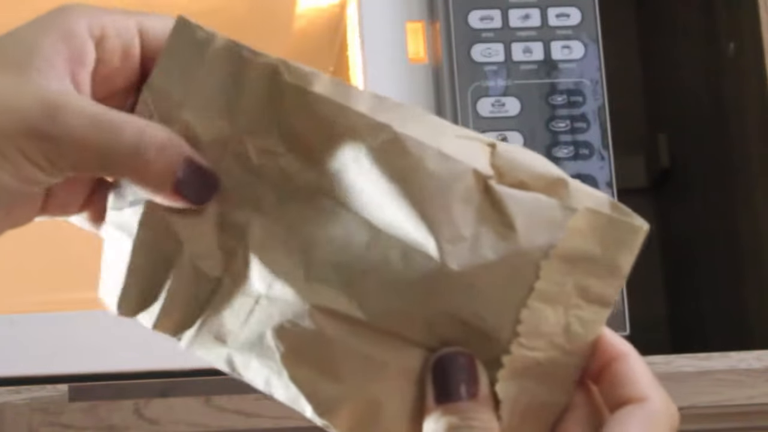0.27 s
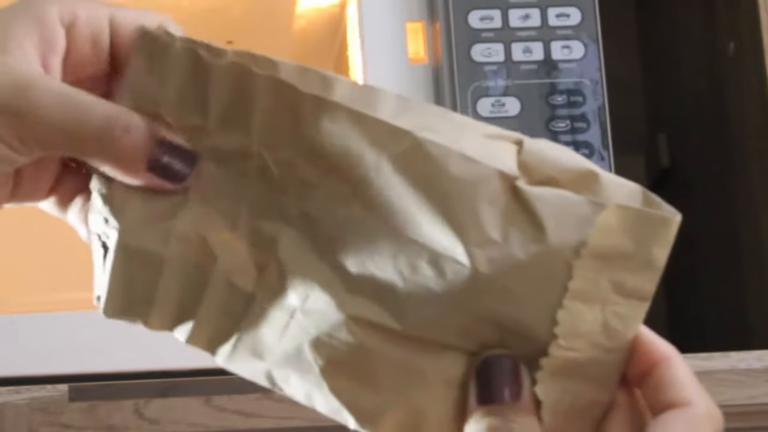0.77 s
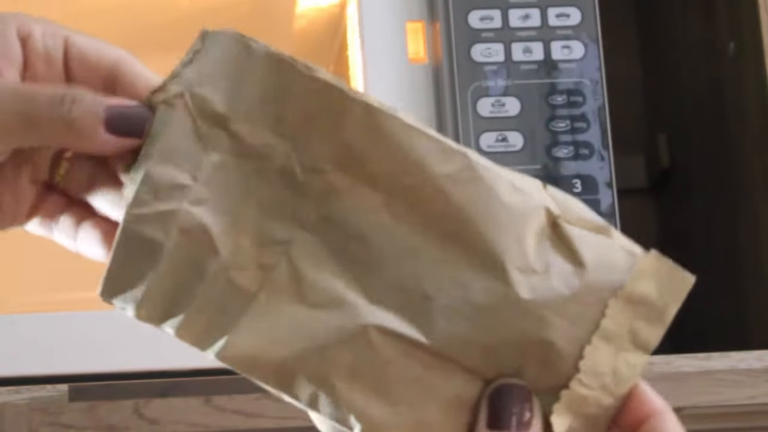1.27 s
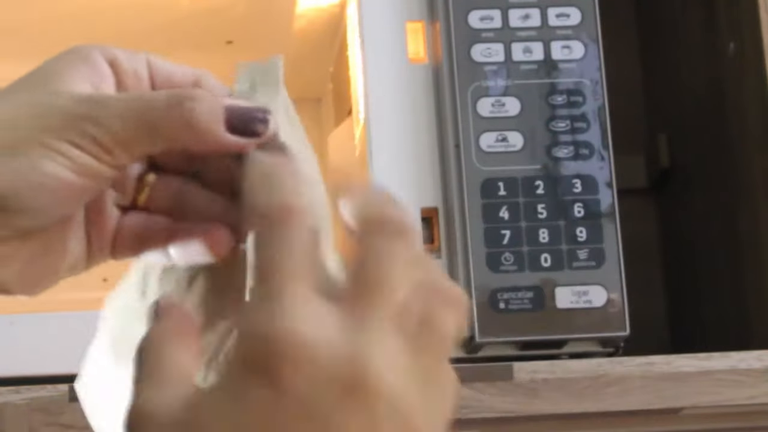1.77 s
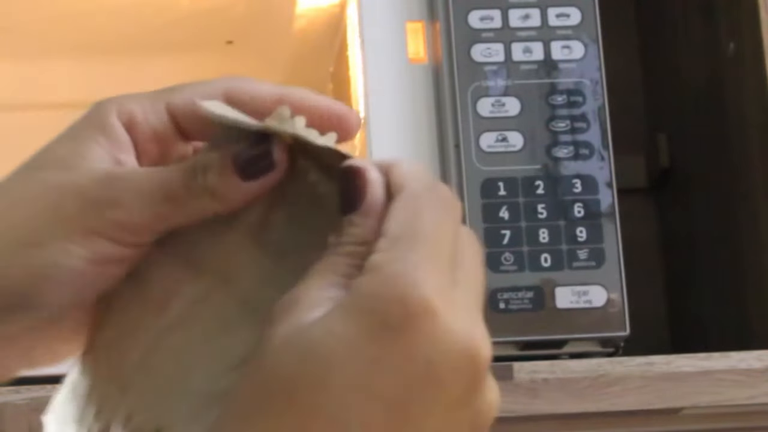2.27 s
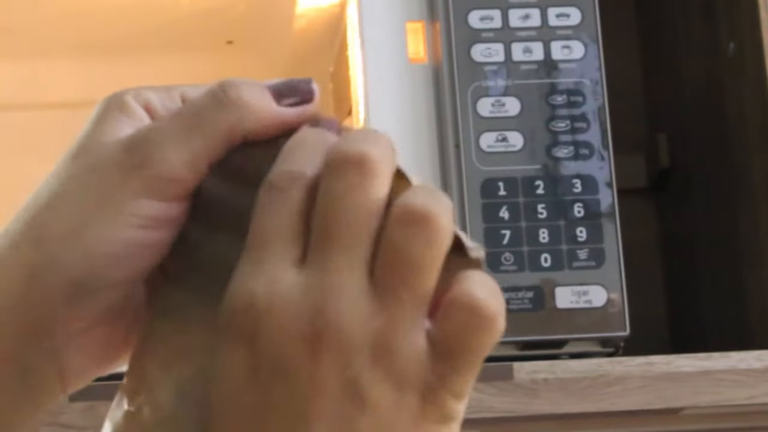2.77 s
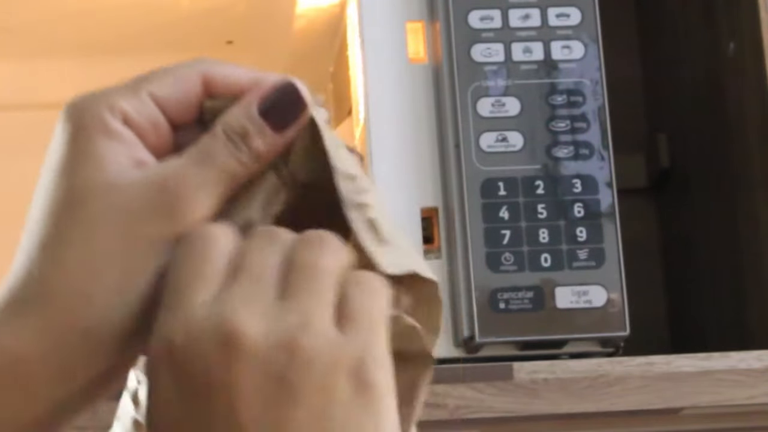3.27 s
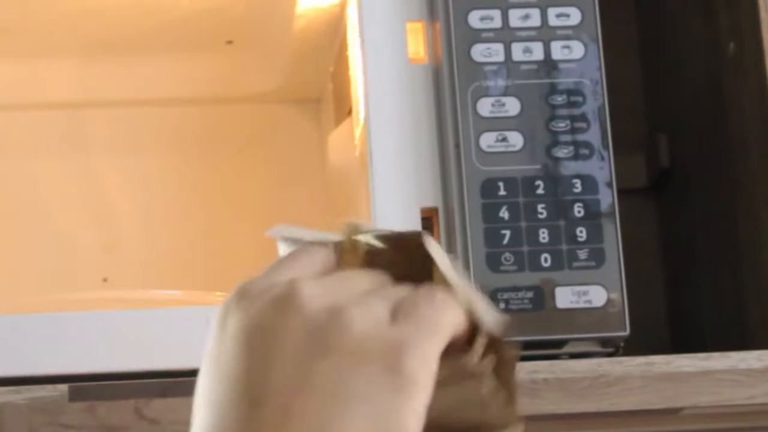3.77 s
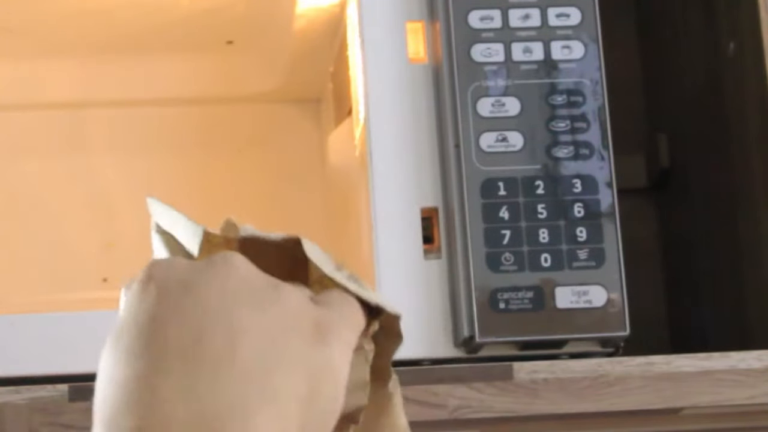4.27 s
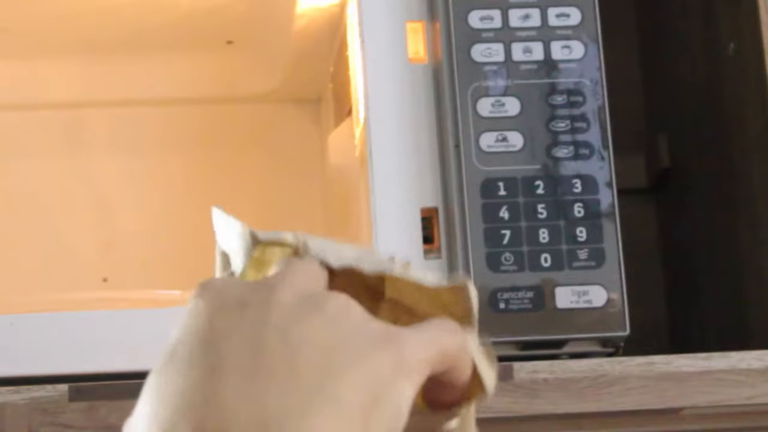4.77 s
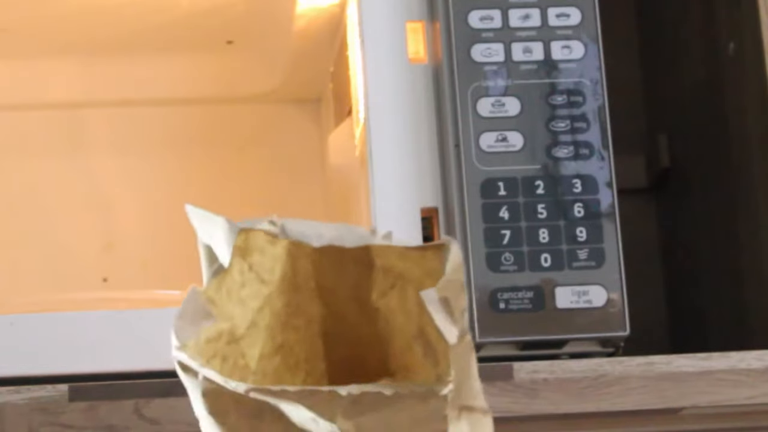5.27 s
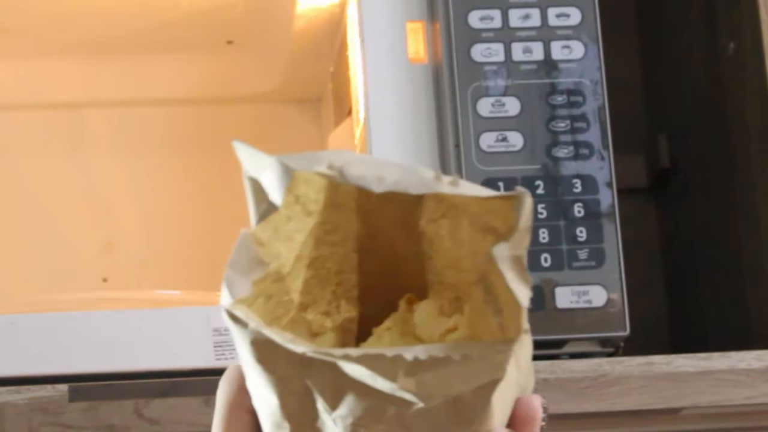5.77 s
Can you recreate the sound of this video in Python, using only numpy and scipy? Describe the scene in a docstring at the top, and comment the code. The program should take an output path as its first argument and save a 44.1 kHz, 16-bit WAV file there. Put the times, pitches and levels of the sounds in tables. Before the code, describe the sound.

A stiff paper bag crackles sharply, softens into sparse crinkles, then rustles loudly as hands pull it open in a hard-walled kitchen before falling nearly silent.

```python
"""Paper bag unfolded and pulled open by two hands, before an open oven in a hard-walled kitchen.
Creases: random short damped rings in three sizes, levels following the pulls; single buckles add a
ring with a bright edge and set off showers of clicks. Bag radiation and air modes shape them; the
room adds early echoes and a tail of about half a second. Also air puffs, one low thump, and a
floor of rumble and hiss."""
import sys
import numpy as np
from scipy import signal
from scipy.fft import rfft, irfft, next_fast_len
from scipy.io import wavfile
from scipy.ndimage import uniform_filter1d

SR = 44100
rng = np.random.default_rng(int(sys.argv[2]) if len(sys.argv) > 2 else 0)


def transcribe(u):
    """Save the signal u as a 16-bit wav file named by the first command-line argument.

    u: samples, shape (n,) or (channels, n), limited to [-1, 1]; the rate is SR.
    q: integer samples, one column per channel.
    """
    v = np.clip(np.atleast_2d(u).T, -1, 1)
    q = np.round(v * 32767).astype(np.int16)
    wavfile.write(sys.argv[1], SR, q)


N = 265261  # samples

# pulls or squeezes of the hands: [start t/s, rise t/s, hold t/s, level/dB,
# wide panels re pull level/dB, fine creases re pull level/dB]
PULLS = [(0.0, 0.0011, 0.053, -28.5, -5.5, -13), (0.135, 0.0032, 0.013, -31.5, -9, -12.5),
         (0.185, 0.012, 0.032, -37.5, -19, -8), (0.274, 0.0055, 0.042, -30.5, -7, -9.5),
         (0.432, 0.0021, .01, -28.5, -6, -10.5), (0.458, 0.01, .05, -35.5, -22, -2.5),
         (0.576, 0.007, 0.052, -33, -16, -11), (0.643, 0.021, 0.085, -33, -1.5, -2),
         (0.76, 0.0079, 0.016, -26, -12, -11.5), (0.865, 0.013, 0.064, -33, -7.5, -9.5),
         (1.099, 0.0082, 0.013, -48, -1.5, -3.5), (1.199, 0.0029, 0.038, -32, -8.5, -9.5),
         (1.39, 0.0035, 0.12, -34.5, -8, -13.5), (1.54, 0.0098, 0.094, -41.5, -6.5, -6),
         (1.695, 0.013, 0.024, -39, -8, -6), (1.856, 0.0033, 0.17, -36.5, -7, -6.5),
         (1.956, 0.0092, 0.2, -40, -3.5, -2.5), (2.109, 0.011, 0.021, -33, -1, -20),
         (2.284, 0.0017, 0.012, -37.5, -4, -2), (2.349, 0.012, 0.094, -39, -5, -0.5),
         (2.52, 0.012, 0.023, -47.5, -18, -1.5), (2.595, 0.026, 0.016, -31.5, -9.5, -8),
         (2.68, 0.0041, 0.0075, -45.5, -10, 2), (2.785, 0.014, 0.011, -41, -4.5, -15),
         (2.83, 0.031, 0.051, -41, -23, -4.5), (2.935, 0.054, 0.057, -34.5, -25, -5),
         (3.027, 0.0031, 0.14, -36, -7, -1.5), (3.129, 0.041, 0.03, -32.5, -7.5, 0.5),
         (3.179, 0.024, 0.041, -23.5, -8, -9), (3.358, 0.036, 0.041, -25, -11, -6),
         (3.47, 0.017, 0.037, -34, -7, -5), (3.532, 0.0045, 0.035, -30, -28, -4.5),
         (3.639, 0.005, 0.038, -32, -32, -10), (3.72, 0.017, 0.039, -27.5, -5, -5.5),
         (3.916, 0.0043, 0.058, -28, -5.5, -8), (4.04, 0.019, 0.13, -31, -5, -9),
         (4.217, 0.0059, 0.2, -29, -13, -9), (4.419, 0.0049, 0.094, -27.5, -11, -11),
         (4.528, 0.007, 0.015, -26.5, -6.5, -5), (4.63, 0.0087, 0.063, -29.5, -12, -7.5),
         (4.74, 0.027, 0.087, -36.5, -15, -11.5), (4.809, 0.018, 0.071, -34, -2.5, -8),
         (5.186, 0.0027, 0.026, -46, -54, 0), (5.636, 0.0027, 0.014, -59, 14, -13.5)]
# fall of level after the hold, as the paper comes to rest
SETTLE_DB_PER_S, WIDE_SETTLE_DB_PER_S, FINE_SETTLE_DB_PER_S = 100.5, 98, 178

# crease sizes: [lowest f/Hz, highest f/Hz, mean rate/(clicks per s), ring/cycles,
# size spread level/dB, level re pull/dB]
WIDE_PANELS = (150, 854, 500, 4, 3, -4.5)
FOLDS = (903, 5957, 1801, 3, 1, -7)
FINE_FIBRES = (5995, 14000, 1589.5, 0.5, -2.5, 4.5)
# air pushed out of the bag: [columns as crease sizes]
AIR_PUFFS = (36, 168, 72, 2.5, -1.5, -36.5)

# single loud buckles, before radiation and room: [t/s, ring peak level/dB, ring f/Hz,
# edge peak re ring level/dB]
LOUD_BUCKLES = [(0.0396, -21, 2540, -13), (0.092, -24, 4220, -7), (0.118, -23, 3580, -11),
                (0.1884, -21, 2200, -17), (0.2388, -24, 2500, -17), (0.2704, -24, 4390, -4),
                (0.2846, -17, 2450, -12), (0.2978, -17, 2540, -19), (0.3284, -20, 2070, -13),
                (0.3488, -23, 3530, -5), (0.4114, -26, 2670, -20), (0.4396, -17, 2410, -5),
                (0.463, -18, 4310, -7), (0.4716, -17, 2580, -12), (0.5007, -15, 2890, -10),
                (0.5799, -17, 2020, -13), (0.6485, -22, 4740, -6), (0.661, -19, 2710, -13),
                (0.6774, -20, 2840, -10), (0.7042, -15, 1640, -12), (0.7103, -18, 5380, -4),
                (0.7434, -15, 2580, -13), (0.808, -18, 2670, -13), (0.8646, -13, 1720, -17),
                (0.8702, -22, 1080, -16), (0.9049, -22, 2670, -4), (0.9218, -19, 2450, -15),
                (1.1007, -34, 1980, -13), (1.1269, -30, 1340, -15), (1.2045, -16, 2110, -15),
                (1.2273, -21, 2450, -13), (1.3947, -27, 1640, -5), (1.4226, -26, 1850, -8),
                (1.4933, -24, 2070, -17), (1.5412, -27, 2500, -6), (1.551, -19, 1720, -20),
                (1.6232, -22, 4870, -9), (1.6976, -29, 2200, -15), (1.7506, -28, 1980, -8),
                (1.7866, -30, 3960, -10), (1.8601, -25, 2710, -14), (1.8856, -23, 3230, -16),
                (1.9089, -23, 2840, -14), (1.9579, -21, 2330, -12), (2.1201, -26, 900, -10),
                (2.2912, -22, 3270, -5), (2.3502, -22, 3490, -8), (2.3953, -14, 4010, -7),
                (2.534, -27, 4180, -14), (2.6076, -26, 1890, -6), (2.6941, -24, 2280, -10),
                (2.7352, -29, 1460, -11), (2.7878, -29, 1980, -20), (2.8311, -33, 3490, -11),
                (2.8662, -29, 3320, -5), (2.8729, -28, 8900, -8), (2.8971, -25, 1550, -11),
                (2.9542, -26, 1590, -16), (2.9824, -24, 2670, -11), (3.0295, -16, 4010, -6),
                (3.0784, -21, 3140, -2), (3.1554, -18, 1810, -4), (3.229, -17, 2400, -10),
                (3.2514, -15, 4570, -13), (3.3185, -18, 2450, -16), (3.5045, -18, 1460, -5),
                (3.5455, -18, 2110, -10), (3.5667, -16, 1590, -11), (3.7615, -17, 3000, -10),
                (3.9202, -19, 2580, -9), (4.0399, -20, 1890, -15), (4.0473, -18, 1940, -11),
                (4.0911, -15, 1810, -20), (4.1151, -19, 1940, -8), (4.1535, -22, 1980, -10),
                (4.2407, -19, 5470, -7), (4.334, -18, 2930, -7), (4.4252, -16, 1810, -14),
                (4.4735, -16, 3360, -16), (4.5631, -16, 1770, -9), (4.8172, -26, 2280, -16),
                (4.843, -21, 2580, -9), (4.8529, -19, 2020, -7), (4.969, -28, 1050, -15),
                (5.0132, -32, 1640, -18), (5.0489, -35, 2890, -15), (5.1865, -22, 8500, -6),
                (5.1934, -29, 4690, -6), (5.2097, -30, 1750, -8), (5.246, -31, 2330, -12),
                (5.3106, -39, 3700, -13), (5.6404, -42, 2500, -10)]
# lesser buckles at random moments; peak is relative to the pull level
LESSER_PER_S, LESSER_MAX_DB, LESSER_SPREAD_DB = 4, 6, 6
LESSER_LOW_HZ, LESSER_HIGH_HZ, LESSER_EDGE_DB = 1500, 5130, -10

# free-hanging paper, corner below which the held bag radiates poorly: [t/s, f/Hz]
FREE_PAPER = [(0, 326), (.4, 480), (.9, 362), (1.2, 656), (2.0, 850), (2.15, 515), (2.5, 920), (2.95, 915),
              (3.4, 260), (3.8, 300), (4.4, 470), (4.669, 110), (4.8, 534), (5.1, 614), (5.22, 1520),
              (5.6, 880)]
# pitch coloured by the patch under the fingers: [t/s, f/Hz, lift level/dB]
FINGER_PATCH = [(0.2, 2400, -0.5), (.5, 3040, 0), (.9, 1110, 1.5), (1.12, 1300, 2.5), (1.25, 2930, -0.5),
                (1.42, 1080, 4), (1.58, 1820, 2), (1.75, 3030, 4), (1.95, 3160, 2), (2.14, 1000, 2),
                (2.4, 4080, -1.5), (2.62, 1720, 4.5), (2.82, 2000, 1.5), (2.97, 1450, 4.5), (3.2, 1890, 0),
                (3.6, 2520, 1), (3.77, 985, 3), (4.08, 1630, 1.5), (4.3, 1100, -1.5), (4.57, 1000, 1.5),
                (4.85, 3500, 1.5), (5.02, 980, 2), (5.22, 4730, 4.5), (5.5, 4700, 2), (5.7, 4850, 7)]
PATCH_OCTAVES = 0.53
# air in the bag, folded shut: [f/Hz, width f/Hz, lift level/dB]
SHUT_BAG_MODES = [(496, 20, 5), (663, 17, 10.5), (850, 32, 6)]
# air in the bag, mouth open: [f/Hz, width f/Hz, lift level/dB]
OPEN_BAG_MODES = [(1020, 70, 7), (1720, 150, 8), (2330, 100, 6)]
# how clearly the open mouth rings: [t/s, factor on the open-bag lift in dB]
OPEN_MOUTH = [(1.0, 0.0), (3.0, .1), (3.7, .35), (4.9, .35), (5.03, .7), (5.2, 1.4), (5.3, 1.2), (5.55, .3)]

# air modes of open oven and bag, in the room answer: [f/Hz, width f/Hz, level/dB]
CAVITY_MODES = [(341, 33, -6), (516.5, 46, 7), (686, 36, 1.5), (850, 16, 2), (1024, 52, -3.5),
                (1200, 180, -8), (1680, 23, -15.5), (2366, 96, -11.5)]
# room decay: [f/Hz, t60/s]
KITCHEN_T60 = [(150, 0.5), (600, 0.18), (1800, 0.48), (4500, 0.57), (9000, 0.49), (15000, 0.58)]
# early echoes: [delay t/s, level/dB]
EARLY_ECHOES = [(.0052, -16), (.0095, -36), (0.018, -26), (0.025, -29.5)]
# room tail: [f/Hz, left-right likeness (0 to 1)]
TAIL_LIKENESS = [(40, 0.18), (300, 0.86), (1000, 0.71), (2500, 0.49), (6000, 0.31), (14000, 0.15)]
# microphone response: [f/Hz, level/dB]
MIC_RESPONSE = [(60, -52), (130, -9), (250, -9), (310, -1.5), (400, -2), (800, -5.5), (1500, -2.5),
                (3000, 0.5), (6000, -1.2), (10000, -6.5), (15500, -17)]

# rumble and hiss, spectrum shape: [f/Hz, relative level/(dB per Hz)]
FLOOR_SPECTRUM = [(15, -26), (25, 1), (126, -1), (267, -2), (368, -0.5), (537, -4.5), (1140, -6),
                  (9050, -16), (13900, -24), (15500, -46)]
FLOOR_RMS_DB = -64.5
# rumble and hiss: [f/Hz, left-right likeness (0 to 1)]
FLOOR_LIKENESS = [(60, 0.052), (1000, 0.018)]
# rumble and hiss: [f/Hz, left re right level/dB]
FLOOR_BALANCE = [(30, -6), (100, -3), (250, -0.5)]

# jolt of the whole bag: [t/s, peak level/dB, ring f/Hz, ring/cycles]
BAG_THUMP = (4.635, -42.5, 148, 5.5)
BAND_LIMIT_HZ = 15750


def gain_of(db):
    """Decibels to an amplitude factor."""
    return 10 ** (np.asarray(db) / 20)


def evened(x):
    """Scales to rms 1."""
    return x / np.sqrt(np.mean(x ** 2) + 1e-20)


def read(points, hz):
    """Interpolates a table on a log-frequency axis."""
    f_hz, value = np.transpose(points)
    return np.interp(np.log(hz + 1), np.log(f_hz + 1), value)


def pair(a, b, likeness):
    """Mixes two independent signals into channels of the given likeness."""
    likeness = np.clip(likeness, -1, 1)
    return np.array([a, likeness * a + np.sqrt(1 - likeness ** 2) * b])


def effort(levels_db, settle_db_per_s):
    """Power sum of all pulls in dB: each rises, holds, then settles at a steady dB rate."""
    t_s = np.arange(0, N, 32) / SR
    power = 1e-12
    for (start_s, rise_s, hold_s, *_), db in zip(PULLS, levels_db):
        rising = np.clip((t_s - start_s) / max(rise_s, 1e-3), 0, 1)
        settled_db = settle_db_per_s * np.maximum(t_s - start_s - rise_s - hold_s, 0)
        power = power + (rising * gain_of(db - settled_db)) ** 2
    return np.interp(np.arange(N) / SR, t_s, 10 * np.log10(power))


def buckle(hz, cycles, phase):
    """A crease flips over: sudden start, then a ring damped by the paper within a few cycles."""
    u = np.arange(int(6 * cycles * SR / hz) + 8) * hz / SR  # time in cycles
    ring = np.sin(2 * np.pi * (u + phase)) * np.exp(-2.5 * u / cycles)
    click = ring * np.minimum(u / 0.15, 1)
    return click - click.mean()


def crackle(kind, level_db, clumps, count=12):
    """Sparse clicks of one size, from places spread across the bag, bunched in clumps."""
    low_hz, high_hz, per_s, cycles, spread_db, kind_db = kind
    size = gain_of(spread_db * np.minimum(rng.exponential(1, N), 3))
    size = size * rng.choice([-1., 1.], N)
    size = size * (rng.random(N) < per_s * clumps / SR)
    which = rng.integers(0, count, N)
    out = np.zeros((2, N))
    for k, hz in enumerate(np.geomspace(low_hz, high_hz, count)):
        click = buckle(hz, cycles, rng.random())
        # each place works in spells, 12 random levels per s
        busy = np.interp(np.arange(N) / SR * 12, np.arange(80), rng.standard_normal(80))
        size_here = size * (which == k) * gain_of(2.2 * busy)
        train = signal.oaconvolve(size_here, click / np.linalg.norm(click))[:N]
        # off-centre places: one sample between channels
        out += [train, np.roll(train, (0, 1, 0, -1)[k % 4])]
    return gain_of(kind_db + level_db) * evened(out)


def buckle_rows(pull_db):
    """Loud buckles plus random lesser ones whose peaks follow the pull; columns as LOUD_BUCKLES."""
    when, pitch, size = rng.random((200, 3)).T
    t_s = np.cumsum(-np.log(1 - when) / LESSER_PER_S)
    db = np.interp(t_s, np.arange(N) / SR, pull_db) + LESSER_MAX_DB - LESSER_SPREAD_DB * size
    hz = LESSER_LOW_HZ * (LESSER_HIGH_HZ / LESSER_LOW_HZ) ** pitch
    lesser = [(*row, LESSER_EDGE_DB) for row in zip(t_s, db, hz) if row[0] < N / SR]
    return list(LOUD_BUCKLES) + lesser


def clumping(rows):
    """Click-rate factor, mean 1: random bunching times a decaying shower after each buckle."""
    triggers = np.zeros(N + SR)
    at = [round((row[0] + .002) * SR) for row in rows]
    triggers[at] = np.where(np.arange(len(rows)) < len(LOUD_BUCKLES), 1, .4)
    showers = signal.oaconvolve(triggers, np.exp(-np.arange(4000) / SR / .018))[:N]
    slow_noise = uniform_filter1d(uniform_filter1d(rng.standard_normal(N), 200), 200)
    clumps = gain_of(1.5 * evened(slow_noise)) * (1.6 + showers)
    return clumps / clumps.mean()


def snaps(rows):
    """Each buckle: a ring at its own pitch under a sharp bright edge at 6.5 to 10.5 kHz."""
    out = np.zeros((2, N + SR))
    chance = rng.random((300, 3))
    for (t_s, db, hz, edge_db), (phase, edge_pitch, side) in zip(rows, chance):
        at = round(t_s * SR)
        ring = buckle(hz, 2.0, .2 * phase)
        edge = buckle(6500 + 4000 * edge_pitch, 3.5, phase)
        ring = ring / abs(ring).max()
        edge = gain_of(edge_db) * edge / abs(edge).max()
        pan_db = 3.0 * (side - .5) * np.array([[1], [-1]])
        for click in (ring, edge):
            out[:, at:at + len(click)] += gain_of(db + pan_db) * click
    return out[:, :N]


def air_puffs(pull_db, clumps):
    """Low damped pulses of air pushed from the bag; partly independent channels."""
    a, b = [crackle(AIR_PUFFS, pull_db + db, clumps, count=3)[0] for db in (-3, 2)]
    return np.array([a + 0.22 * b, b])


def rustle():
    """Three crease sizes, lesser buckles and air puffs follow the pulls; loud buckles have their
    own times and levels; returns creases, puffs."""
    db, wide_db, fine_db = np.transpose(PULLS)[3:]
    pull_db = effort(db, SETTLE_DB_PER_S)
    rows = buckle_rows(pull_db)
    clumps = clumping(rows)
    creases = crackle(WIDE_PANELS, effort(db + wide_db, WIDE_SETTLE_DB_PER_S), clumps)
    creases += crackle(FOLDS, pull_db, clumps)
    creases += crackle(FINE_FIBRES, effort(db + fine_db, FINE_SETTLE_DB_PER_S), clumps)
    return creases + snaps(rows), air_puffs(pull_db, clumps)


def lift_db(modes, hz):
    """Sum of bell-shaped resonance lifts in dB."""
    return sum(db / (1 + (2 * (hz - f) / width) ** 2) for f, width, db in modes)[:, None]


def radiate(x):
    """Bag radiation: shelf below the free-paper corner, patch pitch and bag-air resonances."""
    hz, t_s, z = signal.stft(x, SR, nperseg=1024, noverlap=768)
    point_s, corner_hz = np.transpose(FREE_PAPER)
    octaves = np.log2((hz[:, None] + 1) / np.interp(t_s, point_s, corner_hz))
    shelf_db = -14 / (1 + np.exp(3.7 * octaves))
    point_s, patch_hz, patch_db = np.transpose(FINGER_PATCH)
    apart = np.log2((hz[:, None] + 1) / np.interp(t_s, point_s, patch_hz)) / PATCH_OCTAVES
    finger_db = np.interp(t_s, point_s, patch_db) * np.exp(-apart ** 2)
    mouth = np.interp(t_s, *np.transpose(OPEN_MOUTH))
    air_db = lift_db(SHUT_BAG_MODES, hz) * np.maximum(1 - mouth, 0)
    air_db = air_db + lift_db(OPEN_BAG_MODES, hz) * mouth
    z = z * gain_of(shelf_db + finger_db + air_db)
    return signal.istft(z, SR, nperseg=1024, noverlap=768)[1][:, :N]


def tail():
    """Early echoes from counter and oven, then dense taps with a decay time per band."""
    taps = np.zeros((2, SR))
    at = np.arange(200, SR - 40, 20) + rng.integers(0, 20, (2, (SR - 221) // 20))
    np.put_along_axis(taps, at, rng.choice([-1., 1.], at.shape), 1)
    taps = taps * np.minimum(np.arange(SR) / SR / 0.0017, 1)  # reverberant field builds up
    hz, t_s, z = signal.stft(taps, SR, nperseg=512)
    z = pair(z[0], z[1], read(TAIL_LIKENESS, hz)[:, None])
    z = z * gain_of(-60 * t_s / read(KITCHEN_T60, hz)[:, None])
    out = signal.istft(z, SR, nperseg=512)[1]
    out = out / np.linalg.norm(out, axis=1, keepdims=True)
    for delay_s, db in EARLY_ECHOES:
        out[[0, 1], round(delay_s * SR) + rng.integers(0, 4, 2)] += gain_of(db)
    return out


def kitchen(x, count=5):
    """Room answer: crossfades among tails as creases move over the bag, through the air modes."""
    place = np.arange(N) / SR * 25 % count  # 25 places per s
    size = next_fast_len(N + SR)
    hz = np.fft.rfftfreq(size, 1 / SR)
    modes = 1 + sum(gain_of(db) / (1 + 2j * (hz - f) / width) for f, width, db in CAVITY_MODES)
    wet = 0
    for k in range(count):
        distance = abs((place - k + count / 2) % count - count / 2)
        weight = np.sin(np.pi / 2 * np.clip(1 - distance, 0, 1))
        wet = wet + rfft(x.mean(0) * weight, size) * rfft(tail(), size)
    return irfft(wet * modes, size)[:, :N]


def floor():
    """Low rumble and hiss: shaped random spectra, slightly patchy in time and frequency."""
    frames, hz = N // 256 + 5, np.fft.rfftfreq(1024, 1 / SR)
    a, b, c, d, patches = rng.standard_normal((frames, 513, 5)).T
    patches = evened(uniform_filter1d(uniform_filter1d(patches, 8, 0), 14, 1))
    z = pair(a + 1j * b, c + 1j * d, read(FLOOR_LIKENESS, hz)[:, None])
    z = z * gain_of(read(FLOOR_SPECTRUM, hz)[:, None] + 1.5 * patches)
    z = z * gain_of(np.outer([.5, -.5], read(FLOOR_BALANCE, hz)))[:, :, None]
    noise = signal.istft(z, nperseg=1024, noverlap=768)[1][:, :N]
    return gain_of(FLOOR_RMS_DB) * evened(noise)


def thump():
    """The whole bag jolts under the hand: one low, soft damped ring."""
    t_s, db, hz, cycles = BAG_THUMP
    jolt, out = buckle(hz, cycles, 0), np.zeros(N)
    out[round(t_s * SR):][:len(jolt)] = gain_of(db) * jolt / abs(jolt).max()
    return out


def scene():
    """Bag and room through the microphone response, plus puffs, thump and floor."""
    creases, puffs = rustle()
    bag = radiate(creases)
    size = next_fast_len(N + SR)
    response = gain_of(read(MIC_RESPONSE, np.fft.rfftfreq(size, 1 / SR)))
    coloured = irfft(rfft(bag + kitchen(bag), size) * response, size)[:, :N]
    return coloured + puffs + thump() + floor()


def record(dry):
    """Low-pass band limit."""
    low_pass = signal.firwin(511, BAND_LIMIT_HZ, window=("kaiser", 9), fs=SR)
    return signal.oaconvolve(dry, low_pass[None], "same")


dry = scene()
out = record(dry)
transcribe(out)
```